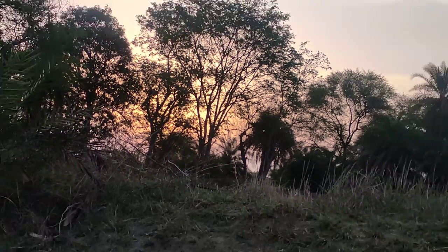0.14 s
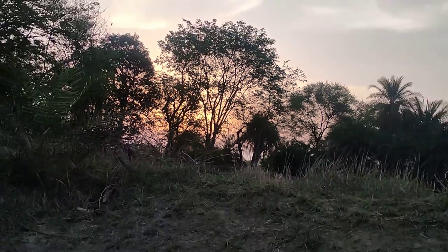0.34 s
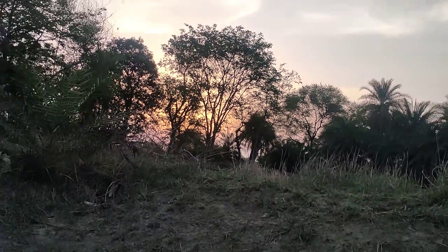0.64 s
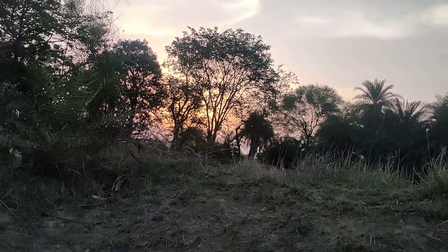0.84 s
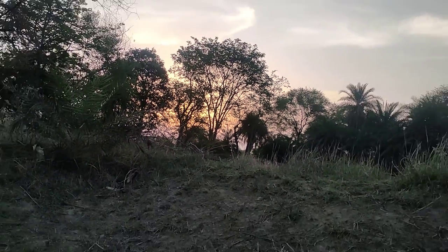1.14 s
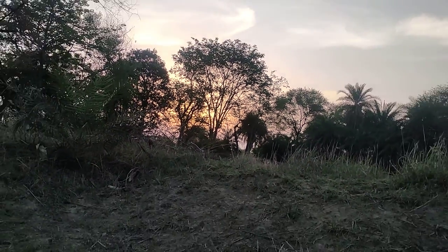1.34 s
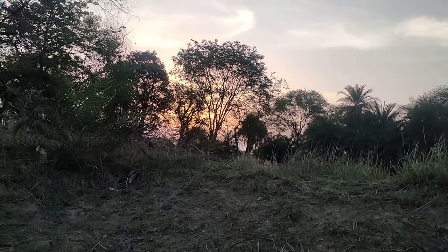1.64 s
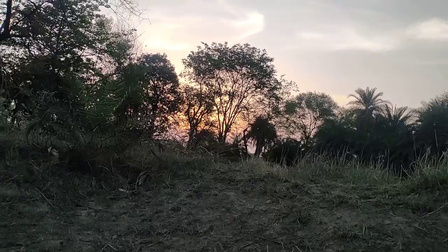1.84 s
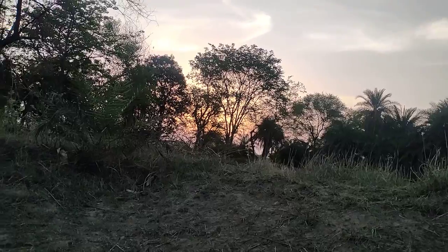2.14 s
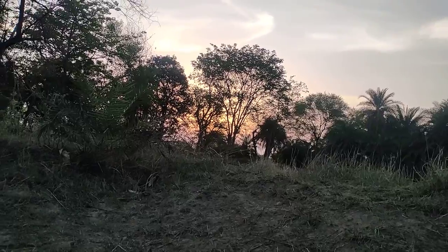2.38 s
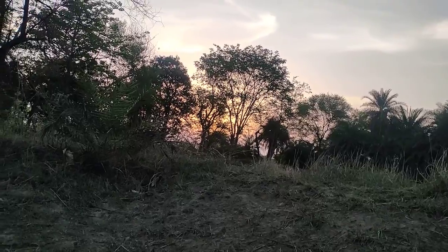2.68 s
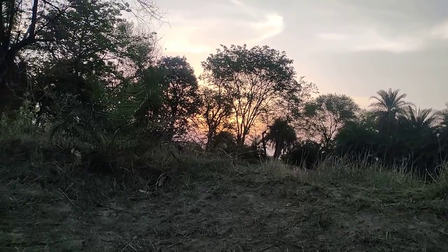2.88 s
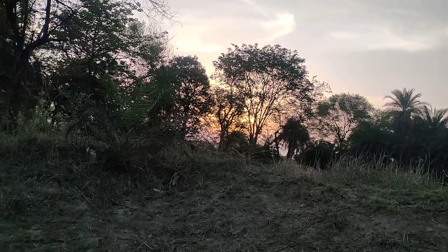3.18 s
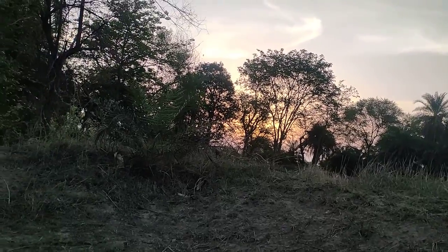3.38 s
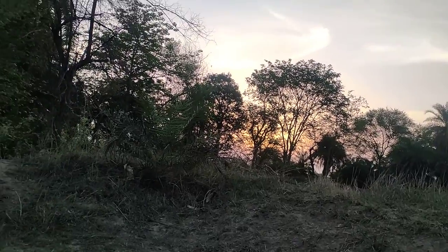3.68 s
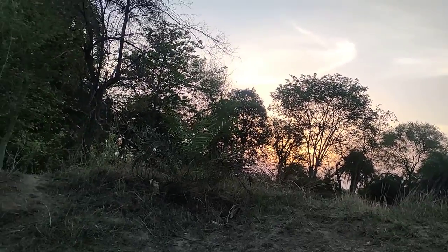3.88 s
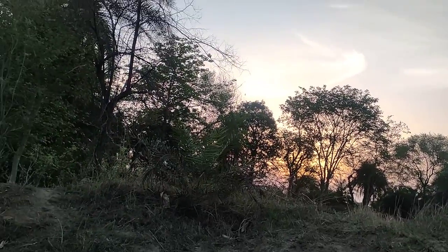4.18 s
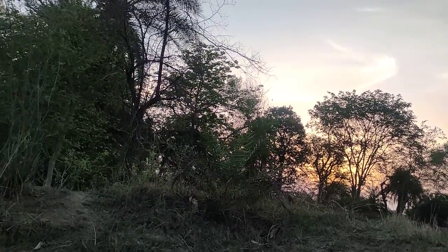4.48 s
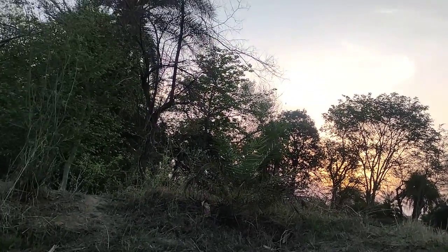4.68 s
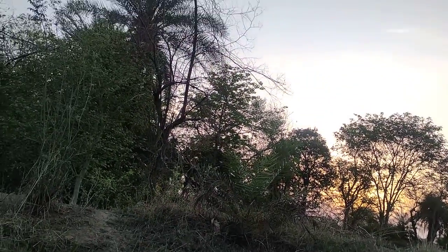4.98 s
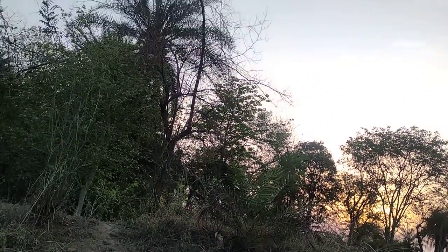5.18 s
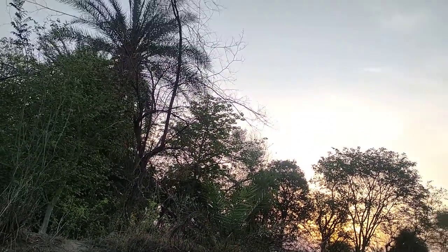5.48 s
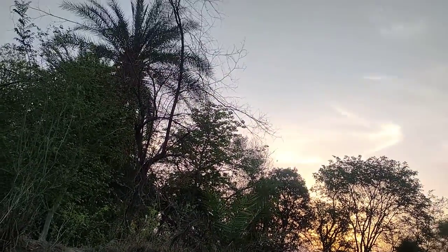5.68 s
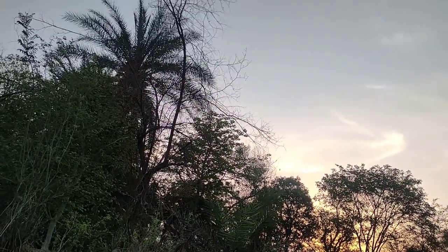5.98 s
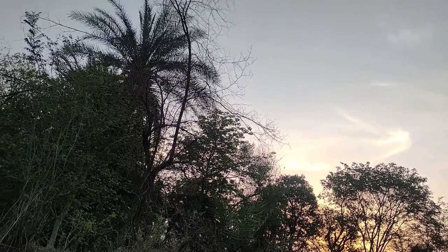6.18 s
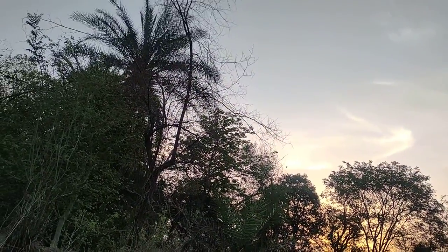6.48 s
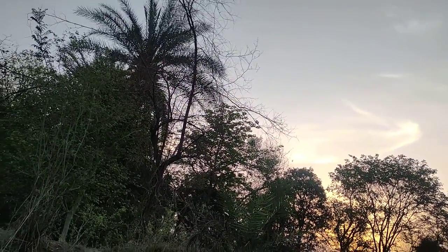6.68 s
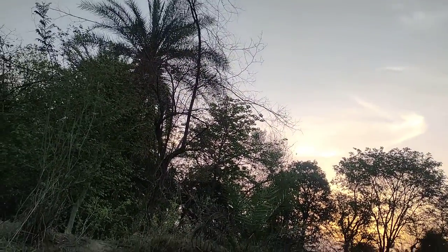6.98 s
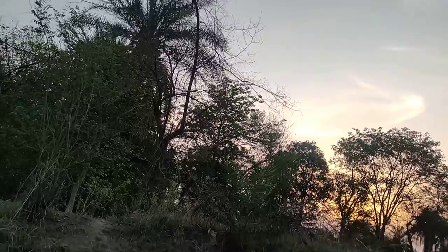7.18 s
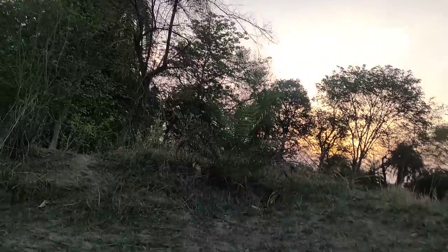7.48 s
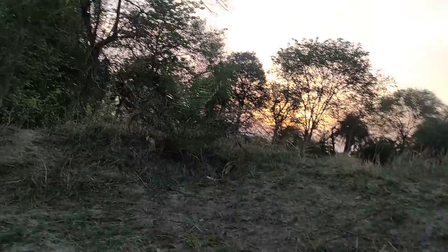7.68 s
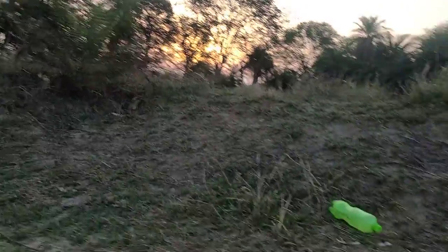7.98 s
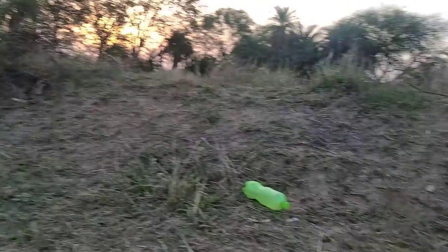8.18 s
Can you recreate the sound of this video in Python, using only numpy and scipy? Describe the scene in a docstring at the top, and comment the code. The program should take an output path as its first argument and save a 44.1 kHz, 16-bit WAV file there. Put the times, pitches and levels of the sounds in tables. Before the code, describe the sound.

Crickets and cicadas trill high and shrill over a far insect chorus while faint birds chirp and whistle and wind thumps a hand-held microphone.

```python
"""Crickets and cicadas trill in several narrow bands at dawn in a grove, over a far chorus, while birds whistle
and chirp among the trees. Insects are tones pulsed once a wing stroke; birds are gliding tones with echoes.
Wind puffs thump on the two ports of a hand-held microphone, which swings round at the end with a rustle of
filtered noise. Quiet air, a faint flutter and a low drone are shaped noise too."""
import sys
import numpy as np
from scipy import signal
from scipy.io import wavfile
from scipy.ndimage import uniform_filter1d

SR = 44100
rng = np.random.default_rng(int(sys.argv[2]) if len(sys.argv) > 2 else 0)


def waveform_to_disk(signal):
    """Save audio, clipped to [-1, 1], as 16-bit WAV at the path in sys.argv[1]."""
    frames = np.transpose(np.atleast_2d(signal))
    scaled = np.clip(frames, -1, 1) * 32767
    samples = np.round(scaled).astype(np.int16)
    wavfile.write(sys.argv[1], SR, samples)


N = 367794
T = np.arange(N) / SR
NEAR_PACE, BUZZ_PACE = 53, 46.1  # strokes a second of the nearest crickets and of a high buzzer


def amp(db):
    """The decibel law: level in dB to amplitude gain."""
    return 10 ** (np.asarray(db) / 20)


def evened(x):
    """Power normalization: scales to rms 1 over all channels together."""
    return x / np.sqrt(np.mean(x ** 2) + 1e-20)


def sides(pan_db):
    """Interaural level difference: left and right gains, half the difference each."""
    return amp(np.array([pan_db, -np.asarray(pan_db)]) / 2)


def curve(rows, t):
    """Linear interpolation: the columns after the first, read at places t along the first."""
    s, *columns = np.transpose(rows)
    return [np.interp(t, s, c) for c in columns]


def add(mix, s, sound):
    """Superposition: mixes a sound in from second s, cut at the end of the mix."""
    part = mix[..., round(s * SR):][..., :sound.shape[-1]]
    part += sound[..., :part.shape[-1]]


def resonate(x, hz, width_hz):
    """Heterodyne resonance: shifts hz down to zero, smooths and shifts back, with gain 1 at the peak."""
    turn = np.exp(2j * np.pi * np.cumsum(hz * np.ones(x.shape[-1])) / SR)
    r = np.exp(-np.pi * width_hz / SR)
    return 2 * (turn * signal.lfilter([1 - r], [1, -r], x / turn)).real


def drift(seconds, size=N):
    """Low-passed chance: white noise averaged twice over a span, at rms 1."""
    span = int(seconds * SR) + 1
    once = uniform_filter1d(rng.standard_normal(size), span)
    return evened(uniform_filter1d(once, span))


def noise(colour, patchy_db, same, size=(6, 16)):
    """Spectral shaping of noise, with patches of size (bins, frames); both ports share the part same."""
    hz = np.fft.rfftfreq(1024, 1 / SR)
    real, imaginary, patches = rng.standard_normal((3, 2, 513, N // 256 + 5))
    patches = uniform_filter1d(patches, size[0], axis=1)
    patches = evened(uniform_filter1d(patches, size[1], axis=2))
    knot_hz, knot_db = np.transpose(colour)
    shape_db = np.interp(np.log(hz + 1), np.log(knot_hz), knot_db, left=-90, right=-90)
    bins = real + 1j * imaginary
    bins[1] = same * bins[0] + np.sqrt(1 - same ** 2) * bins[1]
    bins *= amp(shape_db[:, None] + patchy_db * patches)
    return evened(signal.istft(bins, nperseg=1024, noverlap=768)[1][:, :N])


def insects():
    """Stridulation: each wing stroke pulses a wavering tone, scattered by leaves differently to each port."""
    # bouts of trilling in narrow bands, as loud as heard at each port: start_s, stop_s, swell_s, fade_s,
    # pitch_hz, strokes_per_s, level_db (rms before swell and fade), left_minus_right_db
    bouts = [(0, .9, .01, 0.093, 4860, 65, -58.5, -13), (0, .9, .01, .1, 4710, 58, -60, -9),
             (0, .9, .01, 0.058, 5300, 50, -51.5, -6), (0, 0.97, 0.13, 0.09, 5330, 46, -51.5, 15),
             (0, 1, .01, 0.044, 5640, 39, -60, -14), (0, 1.3, 0.2, 0.37, 6200, 63, -57.5, -19),
             (0.14, 2.5, 0.28, 0.73, 6340, 56, -58, -22), (0, 2.4, 0.23, 0.59, 10580, 39, -64.5, -7),
             (.9, 1.8, 0.27, 0.2, 13000, 76, -68.5, -1), (.95, 1.62, 0.1, 0.1, 4850, 47, -54.5, -8.5),
             (1.65, 1.7, 0.11, 0.16, 4700, 49, -64, -12), (1.6, 3.4, 0.19, 0.27, 11450, 46, -65, -9),
             (1.6, 3.5, 0.26, 0.5, 13420, 49, -70.5, -3), (3.85, 4.8, 0.15, 0.2, 7250, 50, -63, 2),
             (1.8, 4.3, 0.5, 0.43, 14780, 55, -74, -7), (2, 5.5, 0.3, 0.5, 12620, 46, -69, 4.5),
             (2, 4.7, 0.32, 1, 10580, 37, -64, -1), (2.3, 5.5, 0.36, 0.4, 11020, 77, -63.5, -6),
             (2.9, 3.8, 0.27, 0.25, 6480, 72, -62, -11),
             (3.2, 3.98, 0.28, 0.21, 11420, BUZZ_PACE, -57, -8.5),
             (3.9, 4.3, 0.091, 0.1, 6700, 67, -53.5, -4), (3.4, 5.1, 0.4, 0.4, 13480, 33, -67, 6),
             (4.2, 4.53, 0.1, 0.064, 6090, 57, -52.5, -9.5), (4, 6.8, 0.3, .6, 7900, 66, -66.5, -8),
             (4.55, 5.1, 0.1, 0.16, 5815, 49.3, -60, 9),
             (4.56, 5, 0.061, 0.33, 5180, NEAR_PACE, -53.5, -20),
             (4.5, 7.2, 0.4, 0.75, 5460, NEAR_PACE, -48.5, -15.5),
             (6.4, 8.4, 0.39, 0.1, 5480, NEAR_PACE, -50.5, -9),
             (4.5, 7.6, 0.22, 0.14, 5340, NEAR_PACE, -51.5, -7), (4.9, 8.7, 1.8, .15, 5000, 68, -72, 16),
             (5.2, 7, 0.36, 0.72, 11600, 49, -63.5, 1.5), (5.3, 6, .2, .2, 6400, 52, -70, -11),
             (5.5, 6.9, .5, 1, 10900, 71, -67, 7), (5.3, 6.4, .7, 0.46, 13150, 49, -73, -5),
             (6.3, 6.9, 0.58, 0.14, 6200, 57, -66.5, 0), (6.5, 7.3, 0.26, 0.1, 6476, 47, -59.5, -13),
             (7.4, 8.05, 0.28, 0.074, 4800, 64, -50, 12), (7.399, 8.34, 0.37, 0.012, 7500, 42.3, -61, 4),
             (7.85, 8.2, 0.06, 0.1, 5180, 54, -50, 3), (7.55, 7.9, 0.1, 0.1, 6200, 66, -53, 12),
             (7.5, 8.1, 0.13, 0.13, 6470, 77, -47.5, 1), (8.1, 8.34, 0.17, .01, 4300, 45, -52, -1),
             (8.03, 8.34, 0.2, 0.0077, 5250, 48, -43, 12.5), (8.049, 8.34, 0.21, .01, 5560, 48, -51, 8),
             (8.03, 8.34, 0.17, 0.0072, 6460, 55, -44, 17.5), (8.08, 8.34, 0.23, .01, 6250, 54, -50, 25.5)]
    # kinds of insect: waver_hz, stroke_sharpness, stroke_split, scattered_share
    cricket, near_cricket, buzzer, cicada = (12, .6, .2, .5), (19, .5, .28, .7), (30, 1.1, .2, .7), (41.1, 0.34,
                                                                                            0.11, 1.4)
    kind_by_pace = {NEAR_PACE: near_cricket, BUZZ_PACE: buzzer}
    cicada_above_hz, stroke_sag_hz = 7000, 30  # pitch sinks through each stroke

    out = np.zeros((2, N))
    for start, stop, swell, fade, hz, pace, db, pan_db in bouts:
        kind = kind_by_pace.get(pace, cicada if hz > cicada_above_hz else cricket)
        waver_hz, sharp, split, scatter = kind
        t = np.arange(start, stop, 1 / SR)
        beat = 2 * np.pi * np.cumsum(pace * (1 + 0.01 * drift(0.31, len(t)))) / SR
        stroke = np.exp(sharp * np.cos(beat) + split * np.sin(2 * beat))
        pitch_hz = hz + waver_hz * drift(0.0121, len(t)) - stroke_sag_hz * np.sin(beat)
        tone = np.sin(2 * np.pi * np.cumsum(pitch_hz) / SR) * stroke
        blur = resonate(rng.standard_normal((2, len(t))), hz, 10 * waver_hz)
        blur = resonate(blur, hz, 10 * waver_hz) * np.sqrt(stroke)
        voice = evened(evened(tone) + scatter * evened(blur))
        bout = np.minimum((t - t[0]) / swell, 1) * np.minimum((stop - t) / fade, 1)
        add(out, t[0], voice * bout * amp(db) * sides(pan_db)[:, None])
    return out


def far_chorus():
    """Incoherent summation: many far insects blend into coloured noise with long patches."""
    # spectrum before levelling: frequency_hz, relative_density_db
    chorus_colour = [(2470, -96), (4200, -61), (4600, -20), (4890, -12), (5460, -3.5), (6610, -8.5),
                     (7370, -17), (8000, -21), (8730, -28.5), (10100, -23.5), (11200, -22), (11900, -26.5),
                     (12300, -30), (13300, -36), (14200, -37), (15500, -34)]
    # level before the insects' high-pass: time_s, level_db, left_minus_right_db
    chorus_level = [(0.0, -46, -6.5), (0.21, -46, -0.5), (0.72, -45.5, -1), (0.95, -46, -2.5),
                    (2.32, -47.5, -0.5), (2.97, -48.5, -2), (3.67, -50, -0.5), (3.81, -47.5, -0.5),
                    (5.83, -45, -1), (6.22, -45.5, 2.5), (6.5, -46.5, 1), (7.22, -46, 3), (7.46, -44, -1),
                    (7.85, -43.5, -3), (8.04, -43, -4), (8.22, -42, 2.5), (8.34, -37.5, 6)]
    db, pan_db = curve(chorus_level, T)
    return noise(chorus_colour, patchy_db=4.4, same=0.25, size=(3, 90)) * amp(db) * sides(pan_db)


def note(rows, under_db=-40, over_db=-40):
    """Frequency modulation: an unsteady whistle with weaker lines at half and one and a half its pitch."""
    t = np.arange(rows[0][0], rows[-1][0], 1 / SR)
    hz, db, pan_db = curve(rows, t)
    wobble = evened(uniform_filter1d(rng.standard_normal(len(t)), 200))
    half_phase = np.pi * np.cumsum(hz * (1 + .008 * wobble)) / SR
    tone = np.sin(2 * half_phase)
    tone = tone + amp(under_db) * np.sin(half_phase) + amp(over_db) * np.sin(3 * half_phase)
    ends = signal.windows.tukey(len(t), .2)
    return np.sqrt(2) * tone * amp(db + 1.5 * wobble) * sides(pan_db) * ends


def glide(start, length, first_hz, last_hz, late, loudest, db, pan_db):
    """Power-law pitch glide: rows of a note that bends between two pitches and swells once."""
    ends_db = -7.5
    u = np.linspace(0, 1, 24)
    swell_db = np.interp(u, [0, np.clip(loudest, .05, .95), 1], [ends_db, 0, ends_db])
    hz = first_hz + (last_hz - first_hz) * u ** late
    return np.transpose([start + length * u, hz, db + swell_db, pan_db + 0 * u])


def long_whistles():
    """Melodic contour: one tune dips, climbs and drops; a higher one rises quickly, holds and sinks."""
    # low contour: time_from_top_s, share_of_top_pitch, relative_db
    low_tune = [(-.3, .885, -6), (-.2, .84, -7), (-.09, .885, -5), (-.04, .965, -1), (.005, 1, 0),
                (.06, .94, -2), (.1, .85, -5), (.13, .8, -12), (.16, .72, -26)]
    # low whistles: top_s, sung_before_top_s, top_hz, level_db, left_minus_right_db
    low_whistles = [(.868, 0.3, 1502, -74.5, 7.5), (1.362, 0.093, 1492, -70, 23),
                    (2.654, 0.33, 1535, -74, 10.5), (5.375, 0.22, 1509, -75, 7)]
    # high contour: share_of_length, share_of_top_pitch, relative_db
    high_tune = [(0, .89, -7), (.12, .97, -5), (.4, 1, -2), (.64, .975, 0), (.79, .925, -8), (1, .79, -14)]
    # high whistles: start_s, length_s, top_hz, level_db, left_minus_right_db
    high_whistles = [(1.732, .47, 1828, -69.5, 4.5), (2.718, .42, 1830, -72, 9.5)]

    out = np.zeros((2, N))
    for s, lead, hz, db, pan_db in low_whistles:
        tune = [(-lead, *curve(low_tune, -lead))] + [p for p in low_tune if p[0] > -lead]
        rows = [(s + t, hz * share, db + d, pan_db) for t, share, d in tune]
        add(out, rows[0][0], note(rows, over_db=-21))
    for s, length, hz, db, pan_db in high_whistles:
        rows = [(s + length * u, hz * share, db + d, pan_db) for u, share, d in high_tune]
        add(out, s, note(rows))
    return out


def short_notes():
    """Pitch glides: short bird notes, and half-pitch lines sounding under other calls."""
    # start_s, length_s, first_hz, last_hz, glide_lateness (exponent), loudest_at_share, level_db,
    # left_minus_right_db, half_pitch_line_db
    gliding_lines = [(1.34, 0.27, 730, 747, 0.9, 0.17, -86, 1, -40.5),
                     (1.8, 0.47, 905, 900, 1.04, 0.52, -81, 3, -40),
                     (2.877, 0.16, 950, 860, 1.3, 0.51, -81, 3, -43),
                     (0.722, .11, 4246, 3390, 1.13, 0.47, -54, -11.5, -16.5),
                     (1.567, 0.1, 2020, 2700, 0.9, 0.48, -80, -0.5, -40),
                     (3.252, 0.12, 3300, 2650, 1.2, 0.46, -80, -17, -42),
                     (4.571, .09, 4270, 3680, 0.8, 0.25, -54, -7, -38),
                     (4.535, .13, 2300, 1800, 0.92, 0.64, -72.5, -6, -40),
                     (5.03, 0.11, 3980, 3100, 1, .5, -69, 7, -10),
                     (7.04, .17, 1500, 1500, 1.1, .5, -81.5, 2, -40),
                     (7.17, .18, 2100, 1500, 1.2, .6, -77, -2, -40),
                     (4.2, .22, 1400, 1240, 1.1, .5, -87, 0, -40)]
    out = np.zeros((2, N))
    for *shape, under_db in gliding_lines:
        rows = glide(*shape)
        add(out, rows[0][0], note(rows, under_db))
    return out


def piping_and_coo():
    """Contoured tones: pairs of falling pipes, a held pipe that drops late and a coo that swells as it sinks."""
    # a long and a short falling note: time_from_start_s, pitch_hz, relative_db
    pipe_tune = [
        [(-.025, 1950, -8), (0, 2180, -2), (.04, 1850, 0), (.075, 1720, -1), (.125, 1550, -8)],
        [(.195, 1810, -1), (.22, 1680, 2), (.26, 1600, -1)],
    ]
    # start_s, level_db
    pipe_times = [(.062, -73), (3.352, -74), (5.466, -69)]
    # start_s, length_s, first_hz, last_hz, glide_lateness, loudest_at_share, level_db, left_minus_right_db
    held_pipe = (5.125, 0.12, 2000, 1700, 5.5, 0.5, -64.5, 6)
    # time_s, pitch_hz, level_db, left_minus_right_db
    low_coo = [(7.24, 350, -82, -9), (7.31, 320, -70, -8), (7.345, 298, -61, -8), (7.375, 276, -60, -8)]
    pipe_pan_db = 4

    calls = [low_coo, glide(*held_pipe)]
    for s, db in pipe_times:
        for tune in pipe_tune:
            calls.append([(s + t, hz, db + d, pipe_pan_db) for t, hz, d in tune])
    out = np.zeros((2, N))
    for rows in calls:
        add(out, rows[0][0], note(rows))
    return out


def chirps():
    """Exponential down-sweep: hoarse chirps about three a second, each over its own reach of pitch."""
    # time_s (when the pitch passes mark_hz), peak_db (nominal), left_minus_right_db, top_hz, bottom_hz
    chirp_rows = [(.044, -67, 9, 3880, 2800), (.364, -70, 4, 3910, 2690), (.688, -69.5, 5, 3820, 2818),
                  (1.023, -68.5, 3, 4130, 2730), (1.378, -75, 18, 3670, 2850),
                  (1.71, -74.5, 12, 3800, 2700), (2.055, -76, 10, 3750, 2980),
                  (2.389, -73.5, 5, 3946, 2750), (2.726, -74, 12, 3780, 2850), (3.042, -73, -6, 3870, 2700),
                  (3.362, -76, 14, 3740, 2880), (3.683, -77.5, -1.5, 3810, 2920),
                  (4.032, -81, -11, 3750, 3000), (4.377, -81.5, 3, 3797, 2900), (4.72, -74, 3, 3720, 2700),
                  (5.405, -78, -1, 3900, 2580), (5.748, -78.5, -3, 3830, 2670),
                  (6.091, -76, -2, 4090, 2420), (6.417, -76, -3, 3951, 2488), (6.746, -72, 0, 4210, 2610),
                  (7.067, -72, -3, 4050, 2580), (7.41, -76, 0, 3700, 2897), (7.722, -72, 0, 4240, 3000),
                  (7.916, -66, -5, 3570, 2972), (8.033, -66.5, 8, 3670, 2800)]
    mark_hz, fall_per_s = 3740, 5.5  # the fall is in nepers a second

    out = np.zeros((2, N))
    hoarse = uniform_filter1d(rng.standard_normal((len(chirp_rows), SR // 5)), 90, axis=1)
    hoarse = evened(hoarse)
    for (s, db, pan_db, top_hz, bottom_hz), wobble in zip(chirp_rows, hoarse):
        t = np.arange(0, np.log(top_hz / bottom_hz) / fall_per_s, 1 / SR)
        wobble = wobble[:len(t)]
        hz = top_hz * np.exp(-fall_per_s * t) * (1 + 0.045 * wobble)
        tone = np.sin(2 * np.pi * np.cumsum(hz) / SR)
        swell = np.sin(np.pi * (t / t[-1]) ** 0.86)
        start = s - np.log(top_hz / mark_hz) / fall_per_s
        add(out, start, amp(db + 4.3 * wobble) * sides(pan_db)[:, None] * tone * swell)
    return out


def far_birds(level_db, count=220):
    """Random superposition: faint short calls from deeper in the grove, at chance times and pitches."""
    out, u = np.zeros((2, N)), np.linspace(0, 1, round(.07 * SR))
    for when, pitch, bend, size, side in rng.random((count, 5)):
        hz = (1900 + 2300 * pitch) * (.7 + .35 * bend) ** u
        call = np.sin(2 * np.pi * np.cumsum(hz) / SR) * np.sin(np.pi * u)
        gains = amp(level_db - 0.95 * size) * sides(10 * (side - .5))
        add(out, when * N / SR, gains[:, None] * call)
    return out


def grove(x, wet_db, t60, rise_s):
    """Diffuse reverberation: adds decaying echoes from trunks and leaves, partly alike in both ports."""
    t = np.arange(SR) / SR
    common, *own = rng.standard_normal((3, SR))
    decay = amp(-60 * t / t60) * (1 - np.exp(-(t / rise_s) ** 2))
    tail = (0.36 * common + 0.59 * np.array(own)) * decay
    tail /= np.linalg.norm(tail[0])
    echoes = signal.fftconvolve(x.mean(0)[None], tail, axes=1)[:, :N]
    return x + amp(wet_db) * echoes


def birds():
    """Direct and reverberant sound: each group of calls has its own echo level and decay."""
    song = grove(long_whistles(), wet_db=-4.5, t60=1.5, rise_s=.1)
    song += grove(short_notes(), wet_db=-5, t60=.5, rise_s=.015)
    song += grove(chirps() + far_birds(level_db=-87), wet_db=2, t60=.35, rise_s=.004)
    song += grove(piping_and_coo(), wet_db=-12, t60=.35, rise_s=.01)
    return song


def wind():
    """Damped membrane response: puffs push it and it swings back near 90 Hz; hard puffs have a sharp edge."""
    # loudest puffs, soft and hard, before the high-pass: time_s, thump_peak_db, edge_relative_to_thump_db,
    # port (0 left, 1 right)
    puff_rows = [(0.123, -29, -20, 0), (0.16, -34, -22, 0), (.22, -38.5, -19, 1), (0.246, -34, -6, 0),
                 (.291, -41.5, 5, 0), (.326, -33.5, -1.5, 0), (.335, -37.5, -11, 1), (.384, -35.5, -6, 0),
                 (.431, -38.5, -2.5, 0), (0.567, -39.5, -26, 0), (.64, -38, -28, 0), (0.686, -36, -2, 0),
                 (.767, -29, -8.5, 0), (0.826, -35, -24, 1), (.838, -33.5, -10, 0), (.928, -32, -16, 0),
                 (0.978, -36, -17, 1), (1.073, -29, -4.5, 0), (1.172, -32, -2, 0), (1.29, -39, -32, 0),
                 (1.379, -34, -6, 0), (1.449, -39.5, -25, 0), (1.521, -32, -12, 0), (1.573, -27, -1, 0),
                 (1.69, -39.5, 5.5, 0), (1.74, -41, -1, 0), (1.776, -25, 0.5, 0), (1.842, -30.5, -28, 1),
                 (1.861, -30, -19, 0), (1.898, -33, 7, 1), (1.902, -28, 5, 0), (1.979, -29, 2.5, 0),
                 (1.996, -34.5, -24, 1), (2.084, -35.5, 3, 0), (2.099, -32, -24, 1), (2.168, -37, -20, 1),
                 (2.172, -32.5, -13, 0), (2.244, -37, -5, 0), (2.33, -40.5, -2.5, 0), (2.379, -40.5, -1, 0),
                 (2.478, -30.5, -7.5, 0), (2.512, -35.5, 1, 0), (3.259, -44.5, -45, 1),
                 (7.672, -43, -33, 1), (7.775, -40, -37, 1), (7.867, -45.5, -22, 1), (8.234, -46, -25, 1),
                 (8.255, -36, -9.5, 0)]
    # gusts, before the high-pass: time_s, level_db, left_minus_right_db
    gust_level = [(0, -46, 14), (.6, -51.5, 9.5), (1.3, -53.5, 20.5), (1.6, -52.5, 11), (2.07, -43.5, 4),
                  (2.5, -59.5, 19), (2.56, -78, 16.5), (3.05, -81, 14), (3.2, -100, 4), (7.45, -100, -8.5),
                  (7.58, -62, -7.5), (8, -68.5, -14.5), (8.34, -52.5, 16.5)]
    # gust spectrum before levelling: frequency_hz, relative_density_db
    gust_colour = [(18, -48), (30, -27), (56, 29), (92, 1.5), (138, -2), (275, -25.5), (330, -55),
                   (430, -33.5), (730, -120)]

    out, t = np.zeros((2, N)), np.arange(-.04, .06, 1 / SR)
    for (s, db, edge_db, port), (turn, pitch) in zip(puff_rows, rng.random((len(puff_rows), 2))):
        hardness = min(amp(edge_db), 1)
        spread_s = np.where(t < 0, .006, .009) * (1 - 0.78 * hardness)  # hard puffs are brief and higher
        hz = (92 + 17 * hardness) * (.9 + .2 * pitch)
        thump = np.cos(2 * np.pi * (hz * t + turn)) * np.exp(-(t / spread_s) ** 2 / 2)
        edge = np.cos(2 * np.pi * (160 * t + turn)) * np.exp(-(t / 0.0015) ** 2 / 2)
        add(out[port], s - .04, amp(db) * (thump + amp(edge_db) * edge))
    flicker_db = 5 * np.array([drift(.012), drift(.012)])
    db, pan_db = curve(gust_level, T)
    out += noise(gust_colour, patchy_db=0, same=0) * amp(flicker_db) * amp(db) * sides(pan_db)
    return signal.sosfilt(signal.butter(7, 58, "high", fs=SR, output="sos"), out)


def rustle():
    """Friction noise: feet and clothes shift in grass in one sweep with harder, ringing scrapes."""
    # spectrum before levelling: frequency_hz, relative_density_db
    rustle_colour = [(120, -6.5), (200, -10), (312, -1), (388, -11), (488, -7.5), (1200, -6.5),
                     (1700, -7.5), (2100, -10), (2460, -17), (3170, -10.5), (4200, -12), (5460, -54),
                     (9240, -120)]
    # treble of the noise: time_s, relative_db
    treble_level = [(7.36, -8), (7.62, -7), (7.76, -5), (8.02, 7), (8.25, 7)]
    # harder scrapes: time_s, lift_of_noise_db, ring_hz, ring_relative_db
    scrape_rows = [(7.394, 1.1, 1497, -2), (7.415, 0.62, 2005, 0), (7.435, 2.1, 794, 3),
                   (7.47, 0.88, 2190, -5), (7.5, 1.9, 500, -3), (7.55, 2.6, 320, -10),
                   (7.78, 1.7, 1225, -12), (7.92, 1.9, 1920, -9), (8.02, 2.9, 1493, -6)]
    start_s, attack_s, hold_s, release_s = 7.36, 0.029, 0.59, 0.3
    level_db, sag_db, pan_db, scrape_s = -65, -1.5, -5.5, 0.022

    grass = noise(rustle_colour, patchy_db=2.2, same=.6) * amp(2.5 * drift(.0015))
    dull = signal.sosfiltfilt(signal.butter(4, 2300, fs=SR, output="sos"), grass)
    grass = dull + amp(curve(treble_level, T)[0]) * (grass - dull)
    lift_db = sum(db * np.exp(-((T - s) / scrape_s) ** 2) for s, db, *_ in scrape_rows)
    grass = grass * amp(lift_db)
    u = np.arange(-3 * scrape_s, 3 * scrape_s, 1 / SR)
    for s, _, hz, ring_db in scrape_rows:
        ring = resonate(resonate(rng.standard_normal(len(u)), hz, 110), hz, 110)
        add(grass, s + u[0], amp(ring_db) * evened(ring) * np.exp(-(u / scrape_s) ** 2))
    knots_s = start_s + np.cumsum([0, attack_s, hold_s, release_s])
    sweep = np.interp(T, knots_s, [0, 1, amp(sag_db), 0])
    return grass * sweep * amp(level_db) * sides(pan_db)[:, None]


def casing_ticks():
    """Impulse response: fingers tick on the casing, each a briefly damped sine."""
    # time_s, level_db (sine amplitude before decay), pitch_hz, left_minus_right_db
    tick_rows = [(2.255, -55, 322, -9), (2.68, -63, 700, -3), (3.517, -49, 322, -5), (7.888, -51, 303, -3),
                 (8.017, -57, 300, -2.5)]
    out, t = np.zeros((2, N)), np.arange(0, .02, 1 / SR)
    for s, db, hz, pan_db in tick_rows:
        tick = np.sin(2 * np.pi * hz * t) * np.exp(-t / 0.0011)
        add(out, s, amp(db) * sides(pan_db)[:, None] * tick)
    return out


def flutter():
    """Moving resonance: a faint low flutter far off is noise in one band that lifts as it swells."""
    centre_s, width_s, skirt_s = 3.94, 0.062, 0.44
    swell_db, skirt_db, rest_hz, lift_hz = -72, -83, 508, 118.7
    swell = np.exp(-((T - centre_s) / width_s) ** 2)
    skirt = np.exp(-((T - centre_s) / skirt_s) ** 2)
    hz = rest_hz + lift_hz * swell
    band = resonate(resonate(rng.standard_normal((2, N)), hz, 180), hz, 240)
    return evened(band) * (amp(swell_db) * swell + amp(skirt_db) * skirt)


def quiet_air():
    """Ambient noise floor: steady, patchy coloured noise."""
    # spectrum before levelling: frequency_hz, relative_density_db
    air_colour = [(76, -44), (130, -12.5), (387, -12.5), (1150, -18), (1660, -14.5), (1870, -24.5),
                  (2370, -12.5), (2590, -23.5), (3000, -14), (3450, -14.5), (3950, -6), (4250, -11.5),
                  (4500, -7.5), (5720, -60), (9680, -120)]
    return noise(air_colour, patchy_db=5, same=0.4) * amp(-77.5)


def low_drone():
    """Narrow-band noise: a steady far-off drone from two resonances at 88 Hz in series."""
    band = resonate(resonate(rng.standard_normal((2, N)), 88, 32), 88, 50)
    return amp(-81.5) * evened(band)


def scene():
    """Superposition of all sources; a high-pass at 4620 Hz leaves the insects little below it."""
    insect_edge = signal.butter(12, 4620, "high", fs=SR, output="sos")
    trills = signal.sosfilt(insect_edge, insects() + far_chorus())
    handling = rustle() + casing_ticks()
    return trills + birds() + wind() + handling + flutter() + quiet_air() + low_drone()


def record(dry):
    """Arrival-time difference: the left port lies a little further from the trees; then the band limit."""
    left_lag, edge_hz = round(.33e-3 * SR), 15700  # lag in samples
    left = np.pad(dry[0], (left_lag, 0), "edge")[:N]
    spaced = np.array([left, dry[1]]) * np.minimum(T / .005, 1)  # opens softly
    low_pass = signal.firwin(511, edge_hz, window=("kaiser", 9), fs=SR)
    return signal.oaconvolve(spaced, low_pass[None], "same")


dry = scene()
out = record(dry)
waveform_to_disk(out)
```